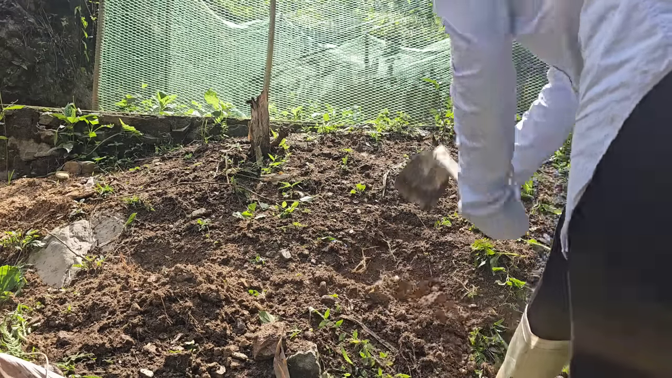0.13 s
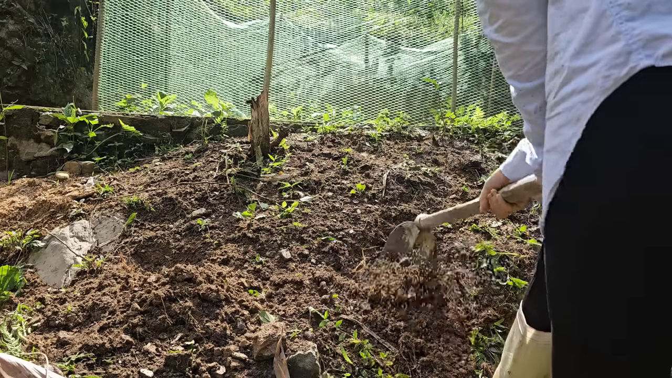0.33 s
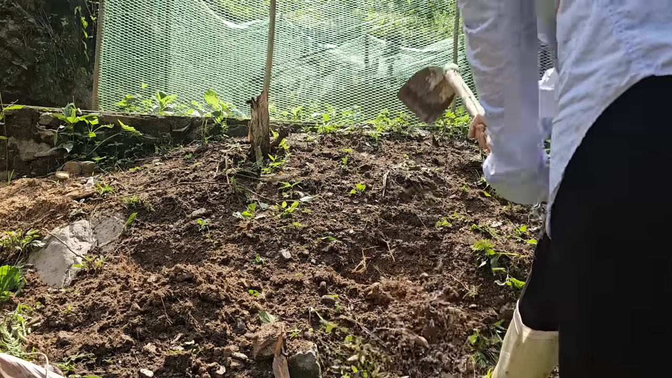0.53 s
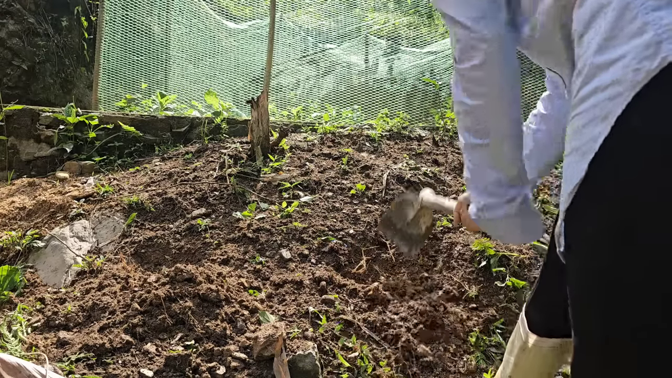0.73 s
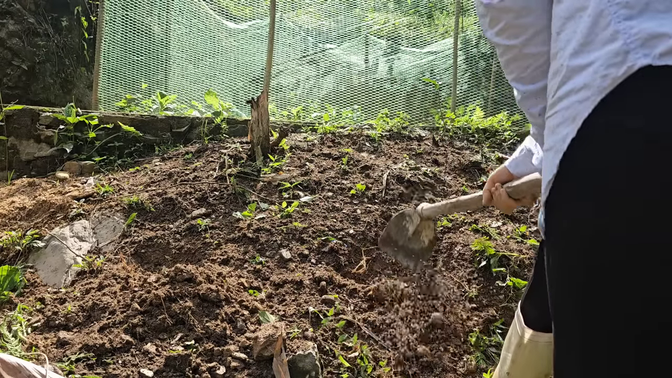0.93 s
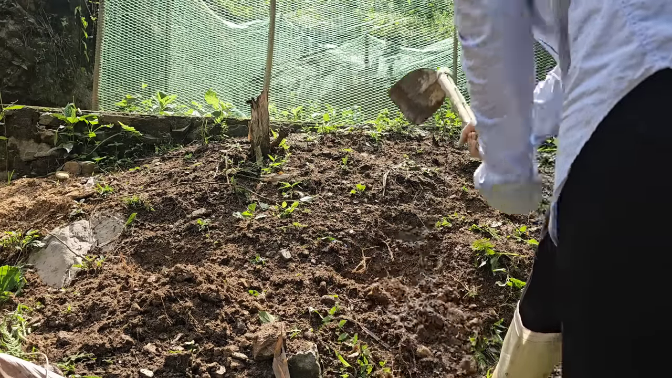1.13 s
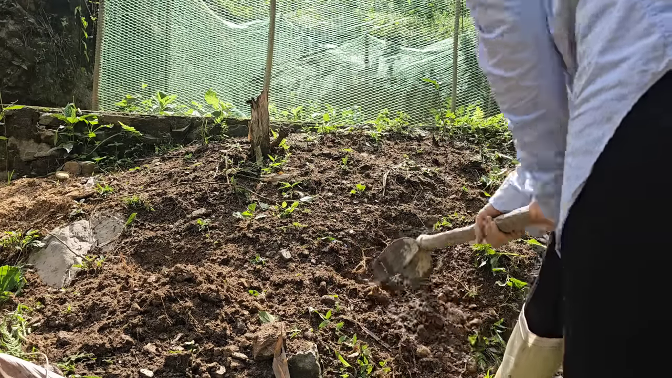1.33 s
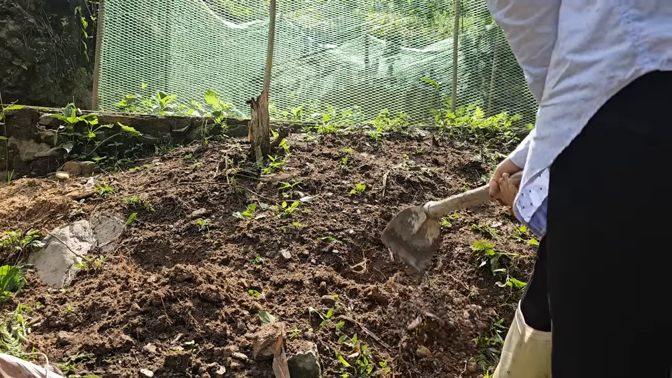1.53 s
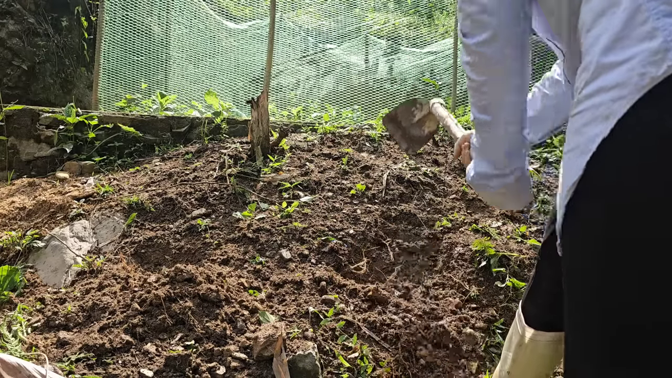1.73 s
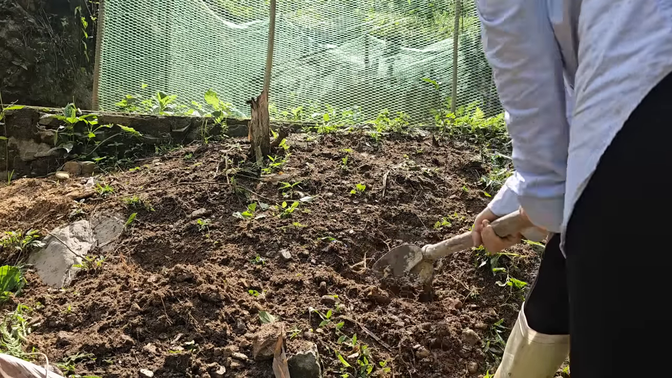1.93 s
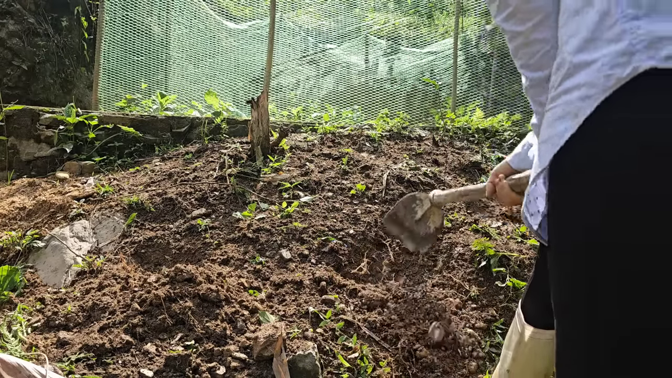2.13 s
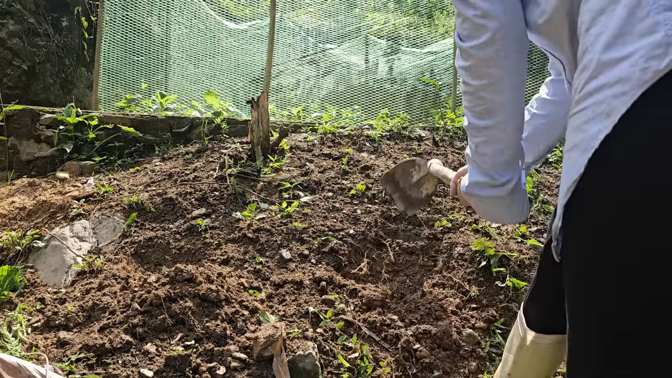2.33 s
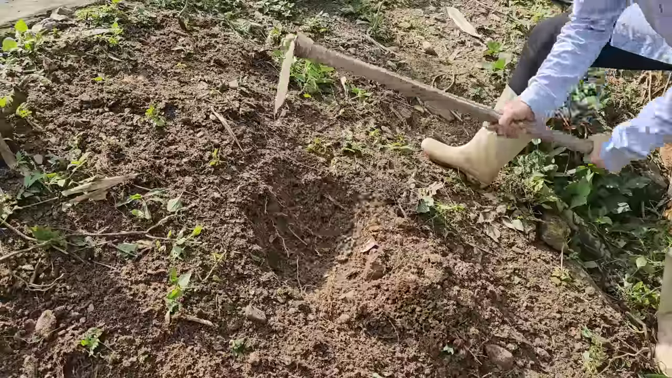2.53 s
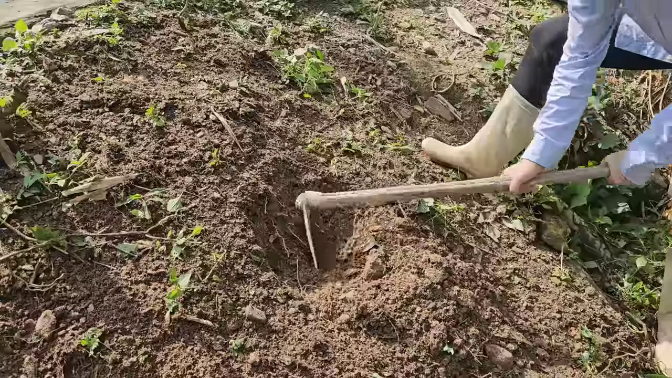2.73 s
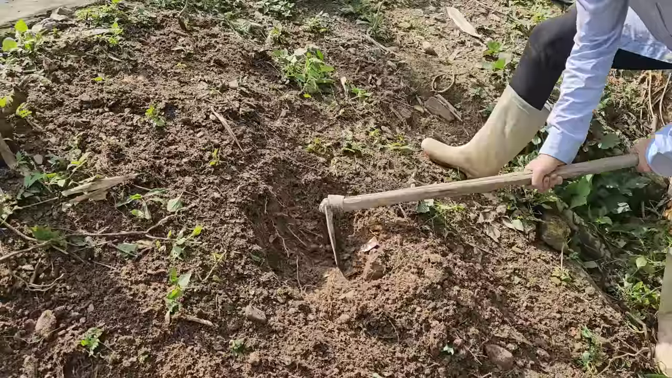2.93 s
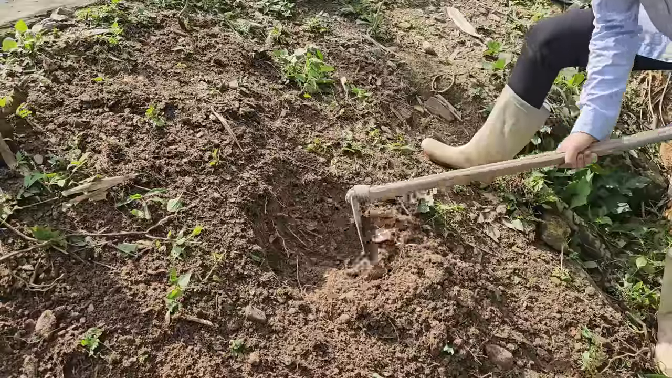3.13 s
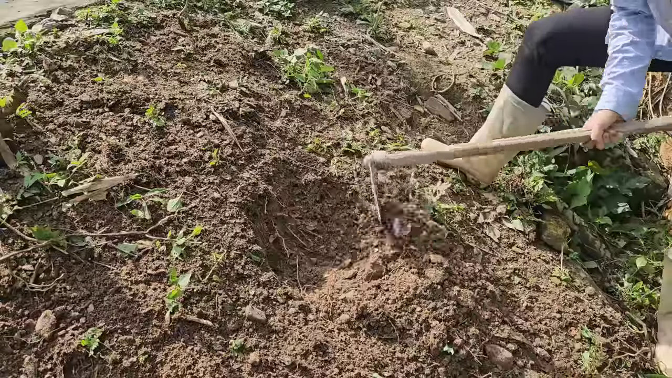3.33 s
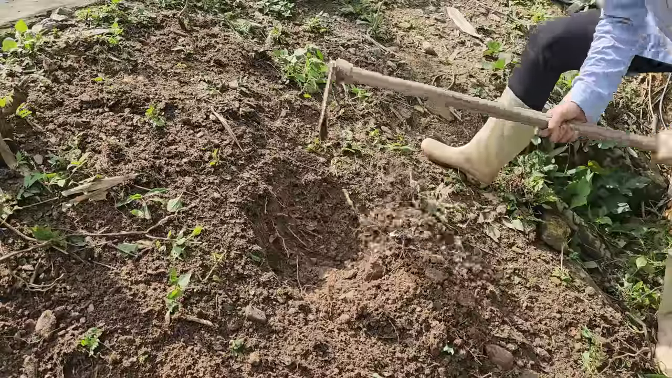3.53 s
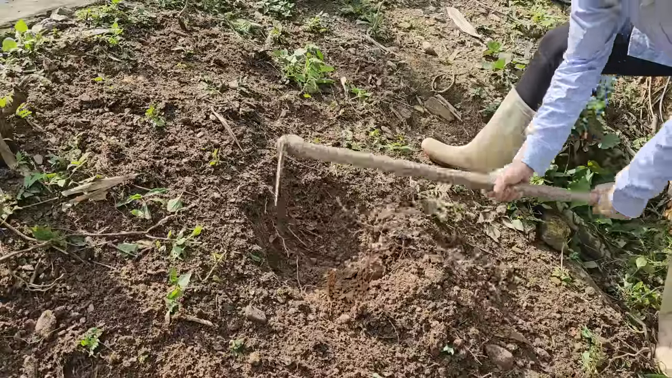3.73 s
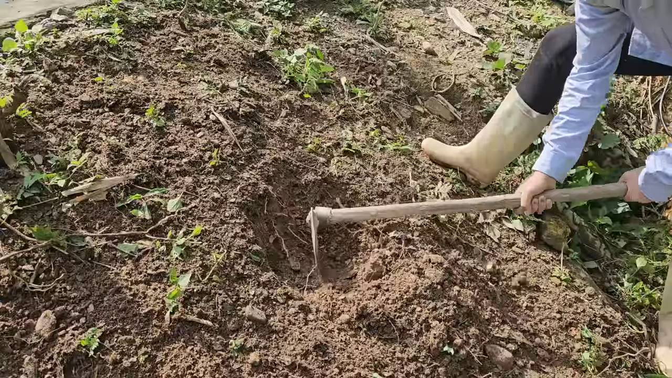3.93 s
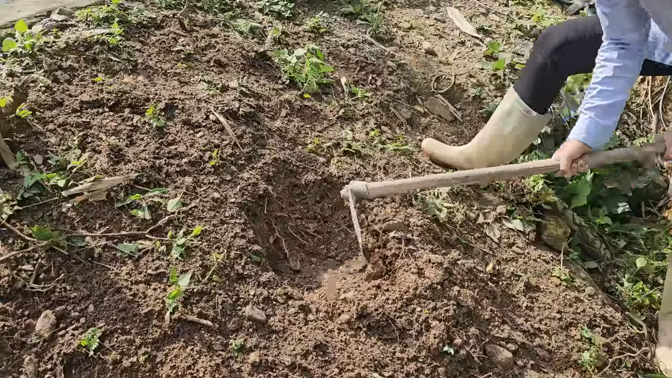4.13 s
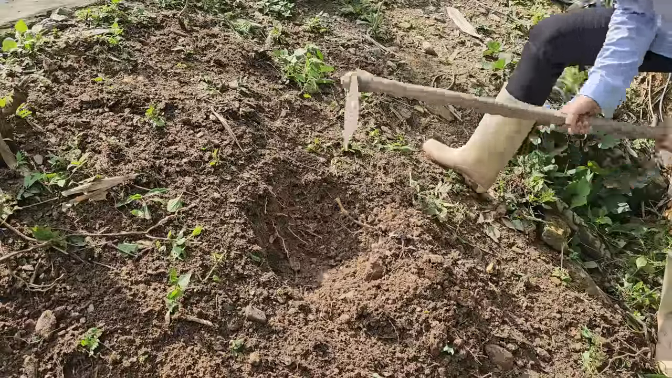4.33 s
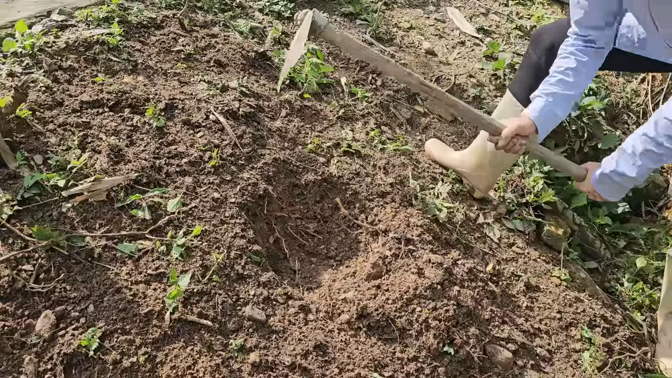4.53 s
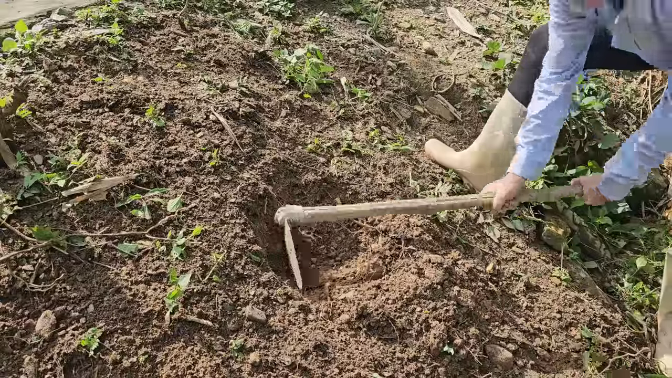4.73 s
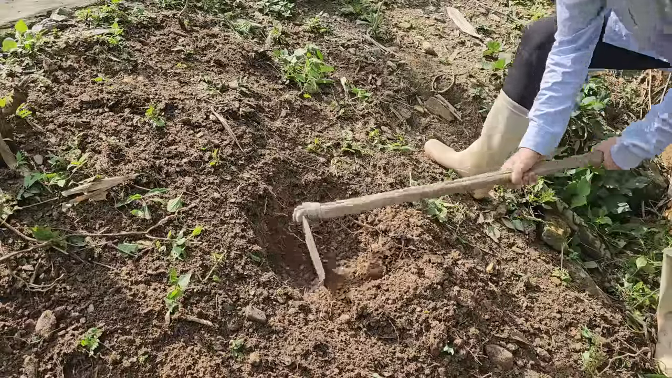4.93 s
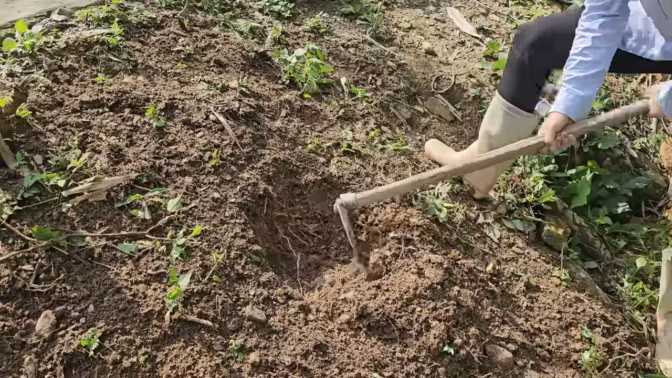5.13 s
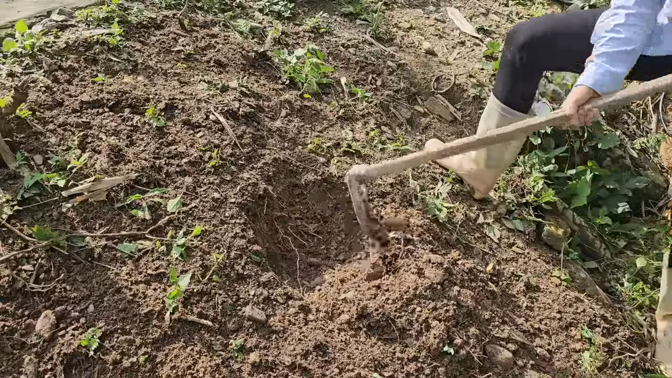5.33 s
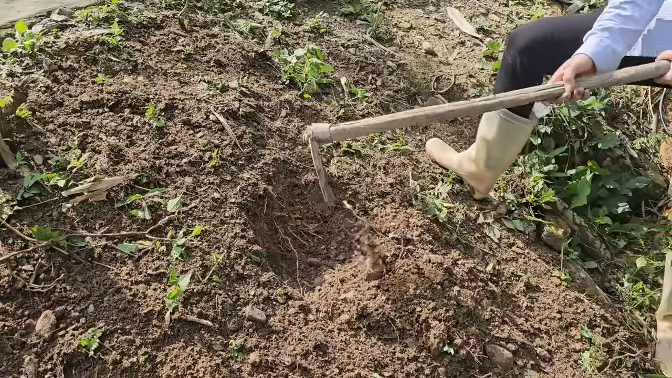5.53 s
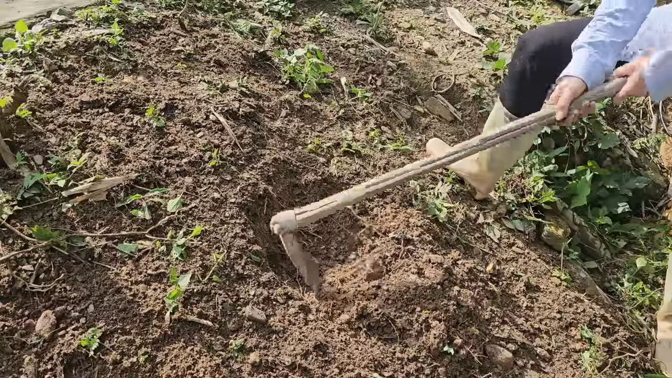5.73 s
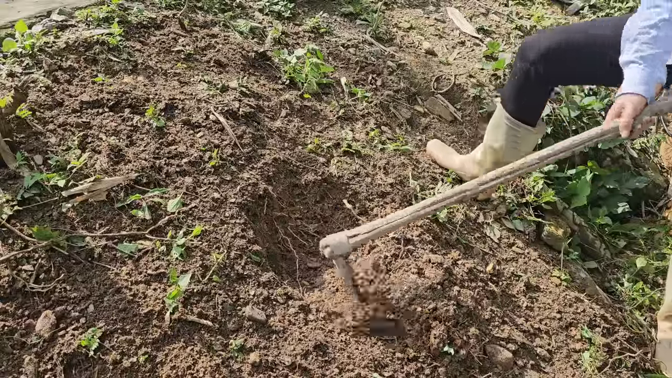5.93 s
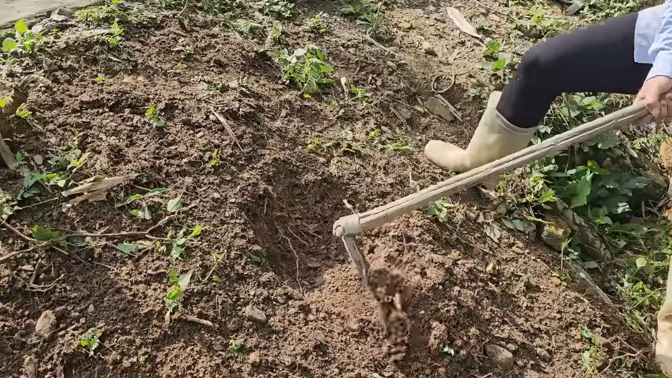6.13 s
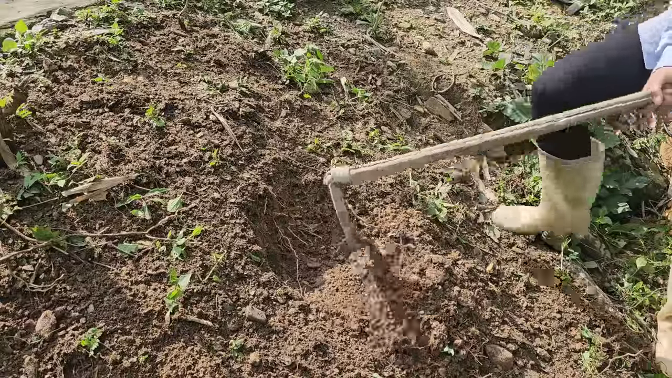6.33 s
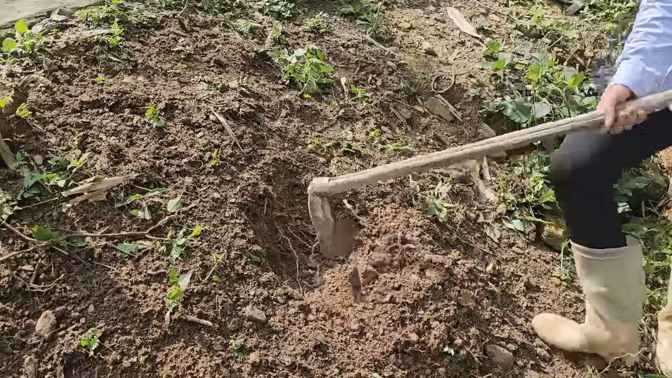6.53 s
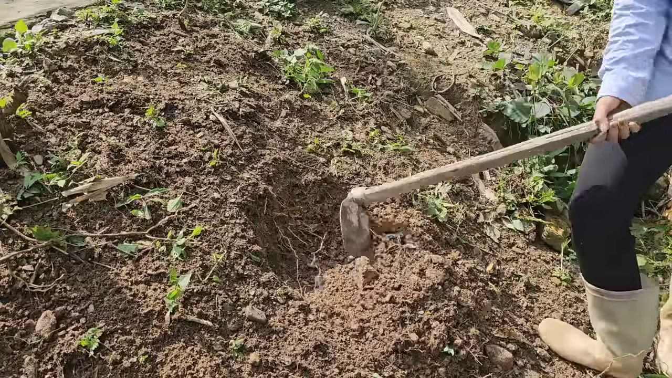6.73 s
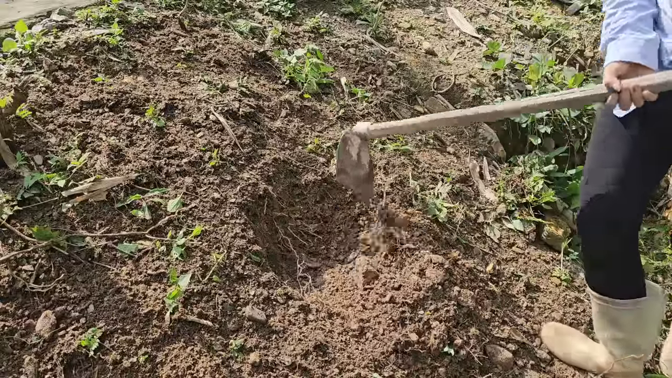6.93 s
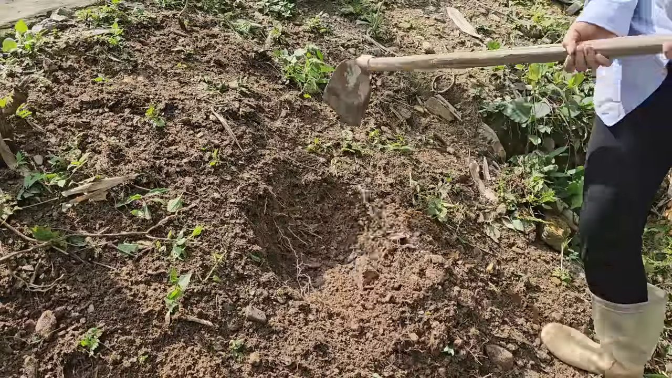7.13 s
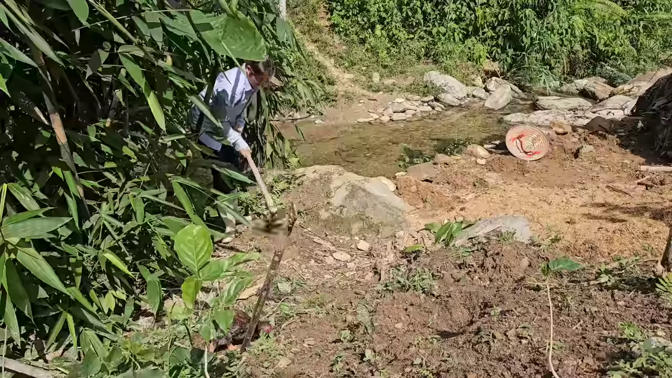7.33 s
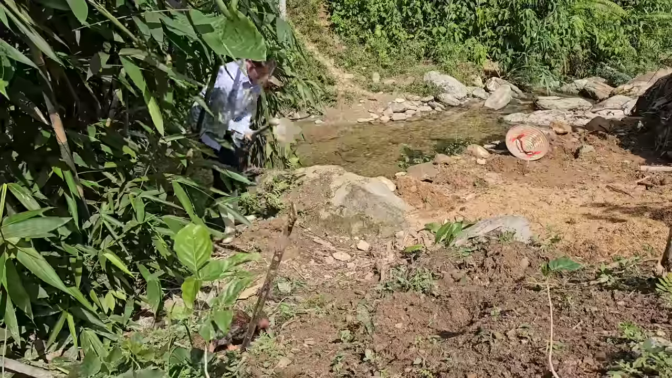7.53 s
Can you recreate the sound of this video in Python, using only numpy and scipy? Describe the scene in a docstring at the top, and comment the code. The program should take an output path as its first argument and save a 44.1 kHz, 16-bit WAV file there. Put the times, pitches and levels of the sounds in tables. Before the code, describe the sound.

Close stereo microphones outdoors pick up a steel hoe working dry, gritty soil. Sharp chops land at about 0.24, 0.84, 1.4, 1.96 and 2.5 s, with another hard one at 2.8 s. Each is a bright crunch with a short, damped metallic knock and low ground thump, then a spray of soil fading over a quarter second. Crumbs tick and trickle between blows; heavier clods drop near 3.2 s. At 3.9 s and again at 4.8-5.1 s the blade bites more softly and drags, a coarse, juddering scrape with steely ringing. More crumbs fall around 5.2 s, and a last knocking chop comes at 5.85 s. Near 6.6 s there is a faint boot step and soil dropping, then little but a crumb at 7.4 s. A distant stream hisses softly throughout, with low wind gusts near 5, 5.7 and 7.1 s and faint, blurred falling bird whistles from 3.8 s.

```python
"""A distant stream hisses throughout, with wind rumbling on the microphones: bands of noise and a lumpy bass.
Close by, a steel hoe on a wooden handle chops into dry garden soil and at times drags through it. Each contact
crushes grit (random clicks), rings the blade's damped modes and thumps the ground (decaying sines); soil sprays,
drops in crumbs and trickles as more clicks. Far off a bird gives falling whistles, blurred to narrow noise."""
import sys
import numpy as np
from scipy import signal
from scipy.io import wavfile
from scipy.ndimage import map_coordinates

SR = 44100
rng = np.random.default_rng(int(sys.argv[2]) if len(sys.argv) > 2 else 0)


def to_wav(s):
    """Save 16-bit WAV."""
    ch = np.atleast_2d(s).T  # columns
    pcm = np.round(np.clip(ch, -1, 1) * 32767)  # PCM
    wavfile.write(sys.argv[1], SR, pcm.astype(np.int16))


N = 334719


def from_db(db):
    """Decibels to amplitude gain."""
    return 10 ** (np.asarray(db) / 20)


def rms_one(x):
    """Scale to rms 1."""
    return x / np.sqrt(np.mean(x ** 2) + 1e-20)


def in_time(s, length, rise_s, fall_s, start_db, end_db):
    """Gain that rises, slopes in dB from one level to another and falls away."""
    t = np.arange(N) / SR - s
    edges = np.clip(np.minimum(t / rise_s, (length - t) / fall_s), 0, 1)
    slope_db = start_db + (end_db - start_db) * np.clip(t / length, 0, 1)
    return edges ** 2 * from_db(slope_db)


def at_hz(points, hz):
    """Read a spectrum on a log-frequency axis."""
    points_hz, values = np.array(points).T
    return np.interp(np.log(hz), np.log(points_hz), values)


def panned(db):
    """Left and right gains for a left-right level difference."""
    return from_db(np.array([[db / 2], [-db / 2]]))


def drift(rate_hz):
    """Slow random wander of spread 1: noise through two equal poles, made at 1/40 of the sample rate."""
    r = np.exp(-80 * np.pi * rate_hz / SR)
    noise = rng.standard_normal(N // 40 + 2002)
    slow = signal.lfilter([1], [1, -2 * r, r * r], noise)[2000:]
    return np.interp(np.arange(N) / 40, np.arange(len(slow)), rms_one(slow))


def resonance(x, hz, width_hz):
    """Two-pole resonance; an impulse sets off a decaying sine of starting height 1."""
    r, w = np.exp(-np.pi * width_hz / SR), 2 * np.pi * hz / SR
    return signal.lfilter([0, np.sin(w)], [1, -2 * r * np.cos(w), r * r], x + 1e-18)


def knock(t, hz, db, rise_s, t60):
    """A damped ring started by a soft contact."""
    return from_db(db - 60 * t / t60) * (1 - np.exp(-t / rise_s)) * np.sin(2 * np.pi * hz * t)


def bands(low_hz, count):
    """Half-octave filters: index, centre in Hz, sections."""
    for k in range(count):
        low = low_hz * 2 ** (k / 2)
        high = min(low * np.sqrt(2), SR / 2 - 1000)
        yield k, np.sqrt(low * high), signal.butter(2, [low, high], "band", fs=SR, output="sos")


def add(envelope, s, db, t60, pan_db=0., rise_s=0.00017):
    """Lay a quick rise and an exponential decay into a stereo envelope."""
    start = int(s * SR)
    t = np.arange(min(int(1.5 * t60 * SR), N - start)) / SR
    burst = from_db(db - 60 * t / t60) * (1 - np.exp(-t / rise_s))
    envelope[:, start:start + len(t)] += panned(pan_db) * burst


def grains(per_s, spread_db, own):
    """Random clicks of uneven size; a share of them reaches each microphone by its own path."""
    clicks = (rng.random((3, N)) < per_s / SR) * rng.choice([-1, 1], (3, N))
    clicks = clicks * from_db(spread_db * np.minimum(rng.exponential(1, (3, N)), 4))
    return rms_one(np.sqrt(1 - own) * clicks[0] + np.sqrt(own) * clicks[1:])


STREAM_DB = -48   # before its treble is stepped down
# relative colour of the far water: (f/Hz, level/dB per Hz)
STREAM_COLOUR = [(75, -6), (120, -1.5), (160, -11.5), (220, -1), (350, -7.5), (550, -1.5), (900, -9.5),
                 (1400, -7.5), (2500, -12.5), (4500, -15.5), (7000, -14), (10000, -18), (14000, -18.5)]
# how alike the water is at the two microphones: (f/Hz, left-right correlation [-1 to 1])
STREAM_LIKENESS = [(60, 1), (240, 0.9), (950, -0.23), (3770, 0.069), (15000, -0.057)]


def stream():
    """Far water: smooth noise, each band wavering a little, wide in the treble."""
    out, white = 0, rng.standard_normal((2, 2, N))
    for k, hz, sos in bands(100.5, count=15):
        mid, side = signal.sosfilt(sos, white[k % 2])   # neighbouring bands use separate noise
        alike = np.clip(at_hz(STREAM_LIKENESS, hz), -1, 1)
        gain = from_db(at_hz(STREAM_COLOUR, hz) + 1.8 * drift(13.3))
        out = out + gain * (np.sqrt(1 + alike) * mid + np.sqrt(1 - alike) * side * [[1], [-1]])
    return from_db(STREAM_DB) * rms_one(out)


WIND_DB, GUST_FADE_S = -61, 0.14   # steady wind, before the lumps
# gusts at the microphones, added to the steady wind before the lumps: (t/s, length/s, level/dB)
WIND_GUSTS = [(0.4, 0.77, -63.5), (4.954, .5, -51), (5.712, 0.32, -52), (6.552, 0.51, -60),
              (7.108, 0.46, -48.5)]


def wind():
    """Lumpy low rumble on the microphones, mostly common to both."""
    rumble = signal.butter(3, [22, 100], "band", fs=SR, output="sos")
    mid, side = signal.sosfilt(rumble, rng.standard_normal((2, N)))
    lumps = from_db(3.5 * drift(12))
    level = from_db(WIND_DB)
    for s, length, db in WIND_GUSTS:
        level = level + in_time(s, length, GUST_FADE_S, GUST_FADE_S, db, db)
    return level * lumps * rms_one(mid + .33 * side * [[1], [-1]])


TICK_DB, SCATTER_DB = 9, 7.5   # tick of landing over the puff; left-right spread of the landing spots
# crumbs and clods landing near the hoe: (t/s, puff level before filtering/dB, pitch f/Hz)
LANDINGS = [(0.159, -47, 9100), (0.4654, -36, 7100), (0.55, -31.5, 760), (0.715, -49, 4130),
            (1.1005, -37, 734), (1.1707, -39, 6000), (1.2251, -34, 1490), (1.256, -32, 2350),
            (1.289, -37.5, 1860), (1.709, -38, 1760), (2.2886, -39.5, 3430), (2.3608, -43, 2140),
            (3.019, -35.5, 1980), (3.1697, -24.5, 790), (3.206, -33, 1460), (3.2133, -32.5, 1460),
            (3.231, -41, 1350), (3.3369, -34, 2220), (4.3754, -38.5, 1760), (5.1936, -39.5, 1300),
            (5.2318, -37, 3720), (5.2587, -25, 6640), (5.397, -39, 3670), (6.0155, -36, 6200),
            (6.035, -36.5, 1520), (6.088, -41, 6400), (6.69, -32.5, 3560), (6.702, -27, 7140),
            (6.8097, -42.5, 6700), (6.949, -44.5, 6240), (7.4064, -31, 3500)]


def clods():
    """Each crumb lands with a tick and bursts into a short puff of grit; big clods are duller and have a pitch."""
    out, grit = np.zeros((2, N)), grains(12000, 3.5, own=.45)
    pans_db = SCATTER_DB * rng.standard_normal(len(LANDINGS))
    for (s, db, hz), pan_db in zip(LANDINGS, pans_db):
        puff = np.zeros((2, N))
        add(puff, s, db, .026, pan_db)
        part = slice(int(s * SR), int(s * SR) + 6000)
        puff = puff[:, part] * grit[:, part]
        puff[:, 12] += panned(pan_db)[:, 0] * from_db(db + TICK_DB)
        dull = np.exp(-2 * np.pi * 5.2 * hz / SR)
        body = 1.2 * signal.lfilter([1 - dull], [1, -dull], puff)
        pitch = .8 * np.sqrt(hz / SR) * resonance(puff, hz, hz / 4)
        out[:, part] += body + pitch
    return signal.sosfilt(signal.butter(2, 500, "high", fs=SR, output="sos"), out)


# close by, the edge meets soil or stone; how deep it sits and what it meets set the pitch of the knock:
# (t/s, crush level/dB, low knock level/dB, low knock f/Hz, middle knock level/dB, middle knock f/Hz)
EDGE_BLOWS = [(0.2394, -8.5, -38, 611, -11.5, 1730), (0.2452, -30, -40, 604, -18, 2310),
              (0.2512, -29, -16, 456, -10.5, 1550), (0.2567, -19, -37, 620, -17, 1270),
              (0.295, -31, -33, 655, -17, 1260), (0.318, -48, -54, 773, -25, 1550),
              (0.8348, -32, -26, 660, -31, 1480), (0.838, -7.5, -7, 654, -12, 1490),
              (0.8434, -45, -12.5, 577, -12, 1440), (0.8878, -53, -24.5, 650, -21.5, 1110),
              (1.399, -9, -14.5, 666, -15.5, 1870), (1.4036, -41, -19, 770, -2, 1516),
              (1.4683, -31, -22.5, 540, -10, 1690), (1.9644, -15.5, -17, 730, -20, 1560),
              (1.9702, -16, -10.5, 492, -12, 1590), (1.9751, -48, -7.5, 616, -1.5, 1430),
              (2.0673, -37, -28.5, 633, -25.5, 1830), (2.5045, -8, -9.5, 640, -6, 1174),
              (2.5526, -50, -35, 760, -27.5, 1530), (2.5698, -50, -26.5, 550, -23, 1660),
              (2.788, -12.5, -27, 770, -36, 1610), (2.7973, -17.5, -20, 640, -28, 2080),
              (2.8041, -16, 2, 662, -41, 1590), (3.8809, -19, -14.5, 713, -21, 2180),
              (3.9353, -38, -19, 504, -32.5, 2080), (3.9499, -21, -30, 770, -18, 1380),
              (4.8066, -19, -22.5, 710, -21, 980), (4.8635, -28, -21, 620, -27, 1190),
              (4.9114, -31, -15, 623, -17, 1640), (5.053, -23, -41, 660, -40, 2200),
              (5.8486, -25.5, -21, 670, -21, 1850), (5.861, -16, -6.5, 858, -4.5, 1093),
              (5.8629, -42, -37, 650, -11, 2090), (5.8874, -58, -24, 704, -23, 1290),
              (5.936, -26.5, -51, 576, -30, 1380)]


def blows(crush, out):
    """Each contact lays a burst of crushing into one envelope and two damped knocks into the sound."""
    t = np.arange(int(.2 * SR)) / SR
    for s, crush_db, low_db, low_hz, middle_db, middle_hz in EDGE_BLOWS:
        part = slice(int(s * SR), int(s * SR) + len(t))
        add(crush, s, crush_db, .036, rise_s=0.00093)
        out[:, part] += knock(t, low_hz, low_db, 0.0011, 0.03)
        out[:, part] += knock(t, middle_hz, middle_db, 0.0003, 0.016)


SPRAY_RISE_S = 0.0075
# a short swell of grit leads into each event: its level against the soil spray, and its rise
LEAD_IN_DB, LEAD_IN_DB_PER_S = -7, 2500
# the blade bites into the ground; the last row is soil dropping off it; levels are before filtering and onset:
# (t/s, time until the thump/s, soil spray level/dB, its t60/s, thud level/dB, ground boom level/dB)
GROUND_CHOPS = [(0.242, 0.0085, -21.5, 0.24, -18.5, -35), (0.835, 0.0048, -27.5, 0.27, -21, -29.5),
                (1.396, 0.0035, -26.5, 0.24, -19, -20.5), (1.963, 0.0072, -28.5, 0.32, -19, -26.5),
                (2.504, 0.00047, -27.5, 0.22, -11.5, -23.5), (2.788, 0.016, -23, 0.26, -13.5, -25),
                (3.88, 0.0042, -30, .1, -25.5, -33), (4.795, 0.0057, -36, .1, -26, -31),
                (4.911, 0, -36, .1, -26.5, -50), (5.847, 0.017, -33.5, 0.33, -18.5, -38),
                (6.688, 0.0061, -35.5, 0.16, -50, -59)]


def chops(crush, spray, out):
    """A swell of grit leads into a spray of soil; just after, the ground thumps as three damped low sines."""
    t, lead = np.arange(int(.2 * SR)) / SR, np.arange(-400, 0)
    for s, stop_s, db, t60, thud_db, boom_db in GROUND_CHOPS:
        add(spray, s, db, t60, rise_s=SPRAY_RISE_S)
        start = int((s + stop_s) * SR)
        part = slice(start, start + len(t))
        out[:, part] += knock(t, 72, boom_db, 0.0068, 0.19)
        out[:, part] += knock(t, 151.4, thud_db, 0.0089, 0.061)
        out[:, part] += knock(t, 233.7, thud_db + 5.5, 0.0016, 0.026)
        crush[:, int(s * SR) + lead] += from_db(db + LEAD_IN_DB + LEAD_IN_DB_PER_S * lead / SR)


DRAG_ATTACK_S, DRAG_RELEASE_S = 0.018, .045
# blade dragging through soil, its level sloping as it goes; levels are before filtering:
# (t/s, length/s, start level/dB, end level/dB, freedom of the blade to ring/dB, extra for its high modes/dB)
BLADE_DRAGS = [(3.863, 0.1, -30, -47, 0, 0.), (3.926, 0.23, -19, -43, 0., 2),
               (4.78, 0.15, -26.5, -49.5, -7, 4), (4.891, 0.22, -27, -37.5, 0.5, -1.5),
               (6.301, 0.098, -52.5, -41.5, 1, 0.)]


def drags(first_db=0, last_db=0, ringing=False, high=False):
    """Gain of rubbing in time: for the soil itself, or for a group of blade modes with its own weights."""
    total = 0
    for s, length, start_db, end_db, ring_db, high_db in BLADE_DRAGS:
        rub = in_time(s, length, DRAG_ATTACK_S, DRAG_RELEASE_S, start_db + first_db, end_db + last_db)
        total = total + rub * from_db(ringing * ring_db + high * high_db)
    return total


# relative colour of the crushed grit: (f/Hz, level/dB per Hz)
GRIT_COLOUR = [(90, -36), (150, -6.5), (370, -13), (600, -9.5), (1500, 0), (3000, -4), (4500, -5.5),
               (6000, 0), (8000, -12), (10500, 0.5), (14000, -8)]


def ground_grit(direct):
    """Crushed and thrown grit in half-octave bands; each size of grain comes in patches of its own."""
    out, patch_db = 0, 2.5
    for k, hz, sos in bands(146.0, count=14):
        patches = from_db(patch_db * drift(22.7))
        gain = from_db(at_hz(GRIT_COLOUR, hz) + 6.5) * (-1) ** k
        out = out + gain * signal.sosfilt(sos, direct * patches + 1e-18)
    return out


TILT_S = 4.5   # the grip changes between the two long drags
MIDDLE_START_HZ, HIGH_START_HZ = 2300, 5000
LOW_MODES_DB, HIGH_MODES_DB = (-4, -3.5), (-2, -8.5)   # weight at the start and at the end of a drag
# damped modes of the blade, excited differently once the hands tilt it; relative levels:
# (f/Hz, width/Hz, level before the tilt/dB, level after/dB)
BLADE_MODES = [(605, 43.7, -1, 4), (740, 52, -0.5, -7.5), (1240, 46, -10.5, 1), (1549, 41, -7, -4.5),
               (2110, 220, 3, -2), (2550, 160, -4.5, -12), (3360, 190, -3.5, -21), (3422, 39, -6, -2),
               (3603, 50, -17, -10), (4574, 97, -1, -4), (4630, 53, -29, -7), (5330, 70, -19, -23),
               (6430, 490, 6.5, 11), (7040, 340, -22, -15), (6300, 18, -9.5, -21), (7560, 52, -3, -9),
               (7710, 22, -16.5, -17), (8330, 62, -4.5, 0), (8700, 44, -6.5, -11), (8990, 91, 4, 6)]


def blade(struck, coarse):
    """Blows and rubbing excite two-pole modes of the steel; the contact point wanders, so each comes and goes."""
    drag_low = drags(*LOW_MODES_DB, ringing=True)
    drag_middle = drags(ringing=True)
    drag_high = drags(*HIGH_MODES_DB, ringing=True, high=True)
    tilted = np.arange(N) > TILT_S * SR
    out, wander_db = 0, 4
    for k, (hz, width_hz, before_db, after_db) in enumerate(BLADE_MODES):
        drag = drag_low if hz < MIDDLE_START_HZ else drag_middle if hz < HIGH_START_HZ else drag_high
        rubbing = drag * coarse * from_db(wander_db * drift(7.3))
        drive = (rubbing + 0.44 * struck) * np.where(tilted, from_db(after_db), from_db(before_db))
        out = out + from_db(-22.5) * (-1) ** k * resonance(drive, hz, width_hz)
    return out


CATCH_DB = 2.8   # spread of the level as the edge judders


def hoe():
    """Grit crushing on the blade is heard directly and through the blade's modes; blows knock and bites thump."""
    crush, spray, out = np.zeros((3, 2, N))
    blows(crush, out)
    chops(crush, spray, out)
    grit = grains(9000, 3.34, own=0.64)
    coarse = grains(2500, 2.7, own=0.48) * from_db(CATCH_DB * drift(52))   # the edge catches and lets go
    crumbs = grains(1500, 1.9, own=0.91) * from_db(1.75 * drift(60))   # loose soil lands in clumps
    sprayed = spray * (0.55 * grit + 0.91 * crumbs)
    direct = crush * grit + sprayed + 0.81 * drags() * coarse
    return out + ground_grit(direct) + blade((crush + spray) * grit, coarse)


# a pebble pings on the steel: (t/s, f/Hz, level before onset/dB, t60/s)
PEBBLE_PINGS = [(.244, 6620, -14, 0.07), (0.715, 4000, -26.5, 0.0088), (1.398, 4690, -14, 0.075),
                (2.806, 4940, -14, 0.043), (5.182, 6100, -43, 0.16), (5.859, 4770, -26, 0.022)]
# one boot step: (t/s, f/Hz, level before onset/dB, t60/s)
STEP = (6.604, 266, -37, 0.06)


def pings_and_step():
    """Single short rings: decaying sines with an onset tied to their period."""
    out, t = np.zeros(N), np.arange(int(.15 * SR)) / SR
    for s, hz, db, t60 in [*PEBBLE_PINGS, STEP]:
        out[int(s * SR):int(s * SR) + len(t)] += knock(t, hz, db, 0.37 / hz, t60)
    return out


TRICKLE_FADE_S = 0.061
# soil trickling off the lifted blade: (t/s, length/s, level before clumping and filtering/dB)
TRICKLES = [(0.438, 0.4, -47.5), (1.025, 0.39, -51.5), (2.864, 0.13, -46.5), (4.128, 0.096, -48),
            (5.079, 0.28, -46.5), (5.979, 0.12, -39.5), (6.705, 0.18, -50)]


def trickle():
    """Fine bright patter: high-passed random clicks that come in clumps."""
    level = sum(in_time(s, length, TRICKLE_FADE_S, TRICKLE_FADE_S, db, db) for s, length, db in TRICKLES)
    patter = grains(2000, 3.2, own=0.59) * level * from_db(2.9 * drift(38))
    return signal.sosfilt(signal.butter(1, 2500, "high", fs=SR, output="sos"), patter)


BIRD_FALL_HZ = 220   # over each whistle
# a far bird's short falling whistle: (t/s, length/s, start f/Hz, level before the blur/dB)
WHISTLES = [(3.813, .07, 3400, -52), (4.32, .12, 4100, -52), (4.396, .1, 3350, -52),
            (5.387, 0.061, 3380, -47), (5.944, 0.066, 3360, -49), (7.02, 0.077, 3350, -53),
            (7.255, .07, 3550, -57)]


def bird():
    """Falling whistles, blurred by leaves and distance into narrow noise."""
    out, blur = np.zeros((2, N)), np.array([drift(130), drift(130)])
    for s, length, start_hz, db in WHISTLES:
        u = np.arange(int(length * SR)) / int(length * SR)
        turns = np.cumsum(start_hz - BIRD_FALL_HZ * u) / SR
        whistle = from_db(db) * np.sin(np.pi * u) * np.sin(2 * np.pi * turns)
        out[:, int(s * SR):int(s * SR) + len(u)] += whistle
    return out * blur


# where the hoe is heard from; the microphones are moved once:
# (from t/s, delay of the right microphone after the left/microseconds, left-right level/dB)
MICROPHONE_PLACES = [(0, -27.5, 1), (2.45, 50.5, 0.5)]


def heard_from_two_points(x):
    """Each microphone gets the sound at its own moment, with a weak ground echo of its own."""
    at, (since, lag_us, pan_db) = np.arange(N), np.transpose(MICROPHONE_PLACES)
    place = np.searchsorted(since[1:] * SR, at)
    half_lag = lag_us[place] * SR / 2e6   # samples
    left = map_coordinates(x[0], [at + half_lag], order=3)
    right = map_coordinates(x[1], [at - half_lag], order=3)
    out = np.array([left, right])
    for side, echo_s in enumerate((.0001, .00015)):
        out[side] += 0.065 * np.interp(at - echo_s * SR, at, x[side])
    return out * panned(pan_db[place])[:, 0]


def step_down(x, hz, db):
    """Everything above a sharp edge is weaker."""
    below = signal.sosfilt(signal.ellip(6, 1, 40, hz, fs=SR, output="sos"), x)
    above = signal.sosfilt(signal.ellip(4, 1, 40, hz, "high", fs=SR, output="sos"), x)
    return below + from_db(db) * above


def scene():
    """The hoe and its soil close by; water, a bird and wind behind."""
    placed = heard_from_two_points(hoe() + clods() + pings_and_step())
    soil = step_down(placed + trickle(), 8590, -10)
    return soil + step_down(stream(), 8150, -13.5) + bird() + wind()


CUTOFF_HZ = 16800


def record(dry):
    """The microphones lose the deep bass; peaks are rounded, the top is cut."""
    heard = signal.sosfilt(signal.butter(2, 36, "high", fs=SR, output="sos"), dry)
    top = .88   # level that rounded peaks approach
    rounded = heard / (1 + np.abs(heard / top) ** 4) ** .25
    return signal.sosfilt(signal.cheby2(16, 90, CUTOFF_HZ, fs=SR, output="sos"), rounded)


dry = scene()
out = record(dry)
to_wav(out)
```